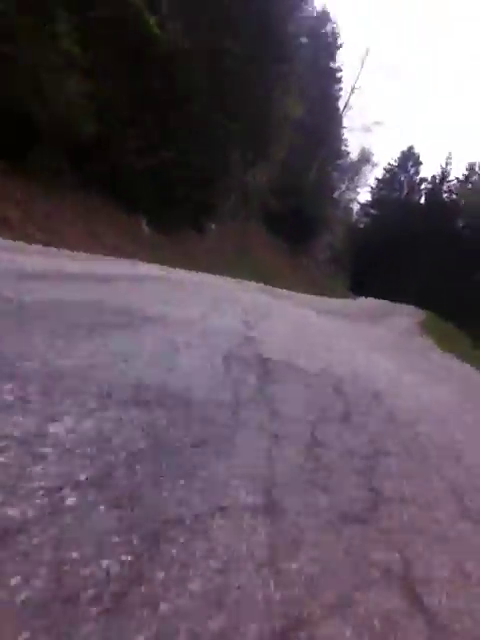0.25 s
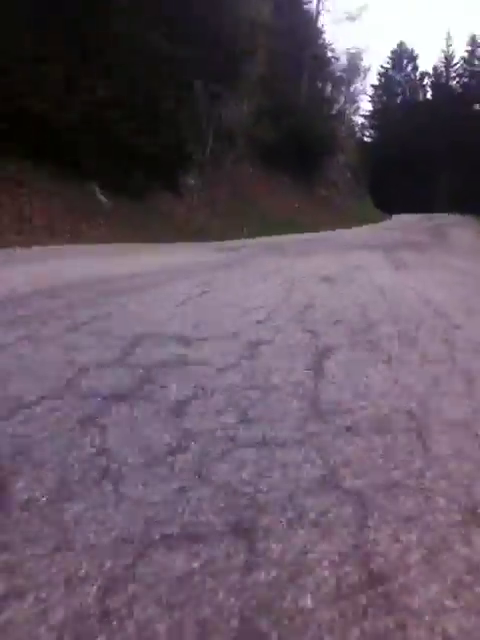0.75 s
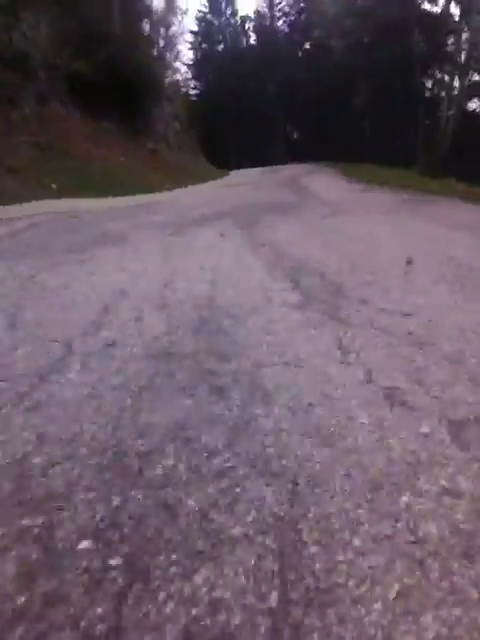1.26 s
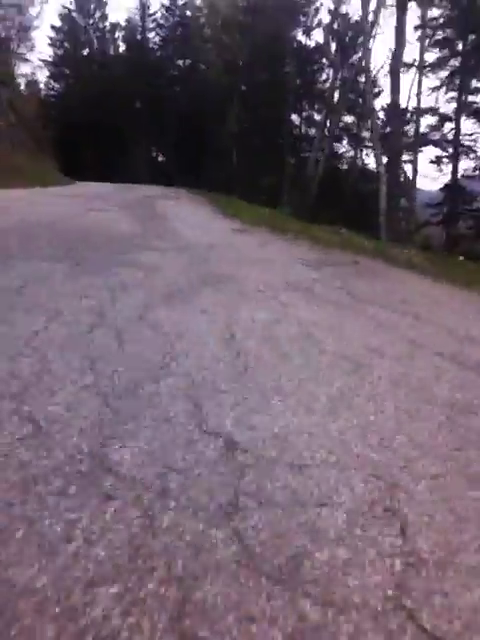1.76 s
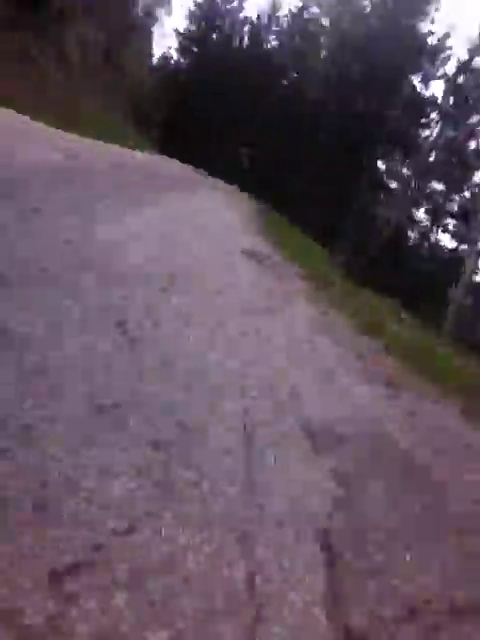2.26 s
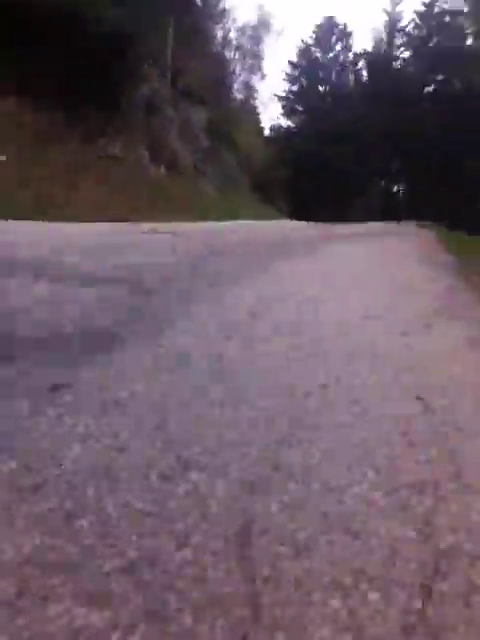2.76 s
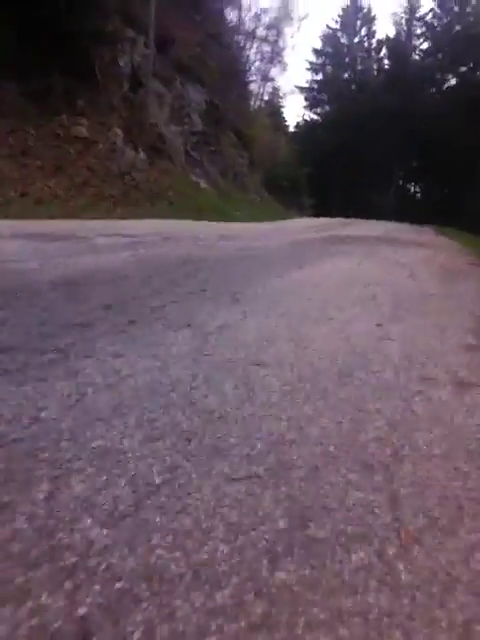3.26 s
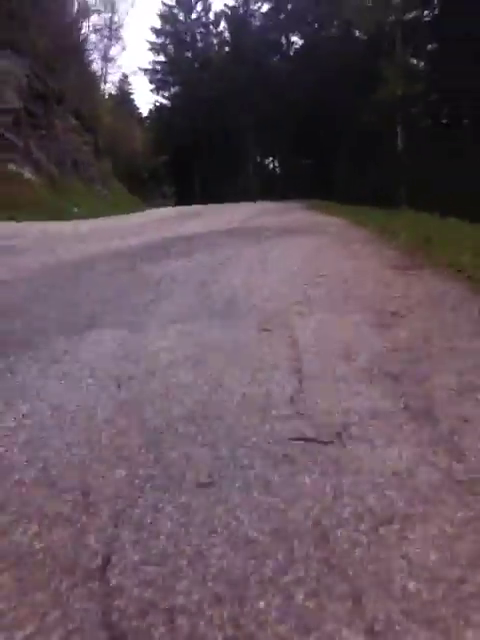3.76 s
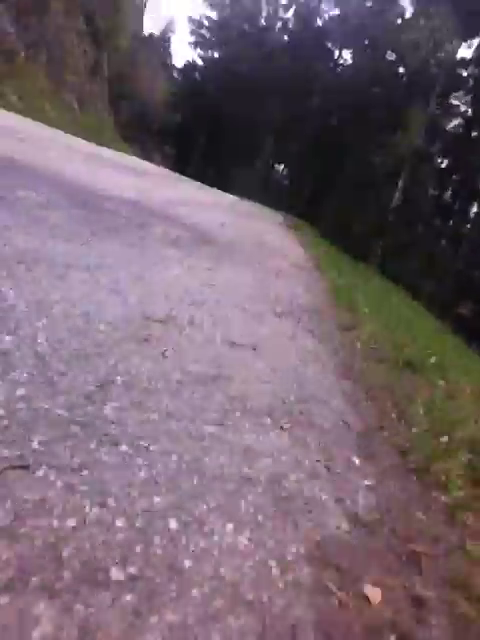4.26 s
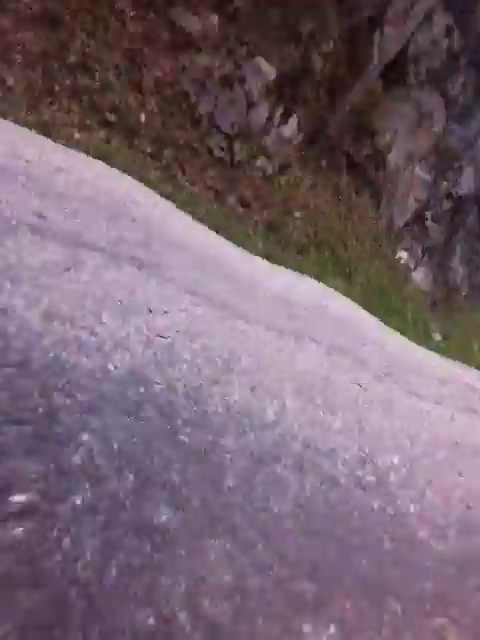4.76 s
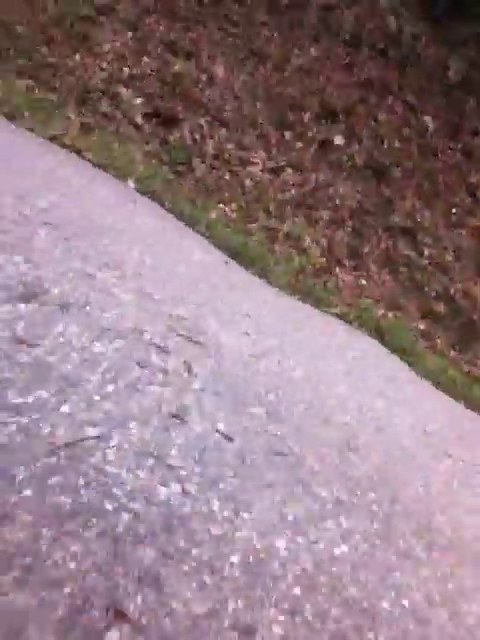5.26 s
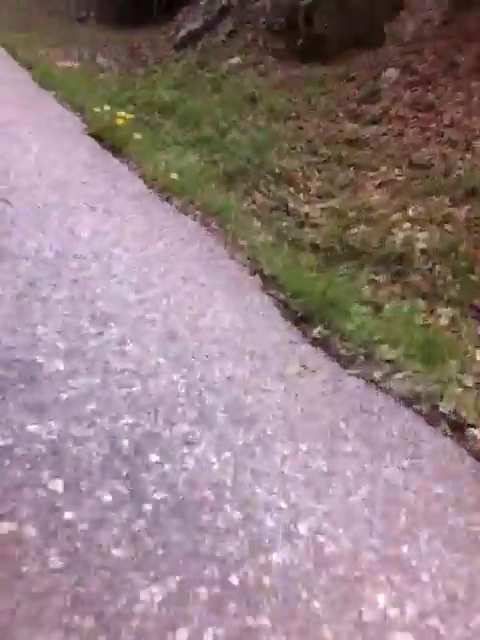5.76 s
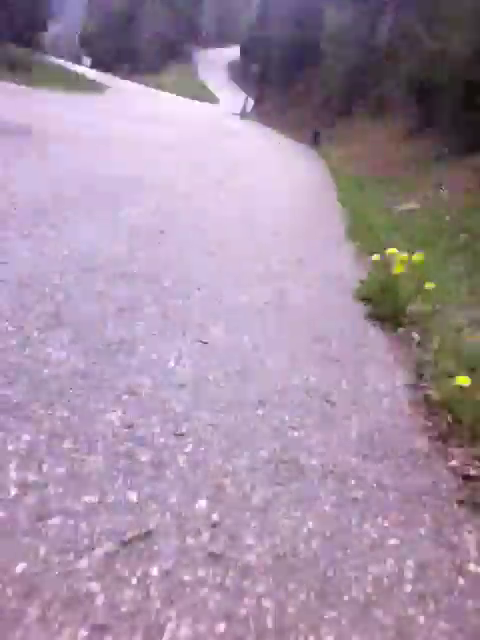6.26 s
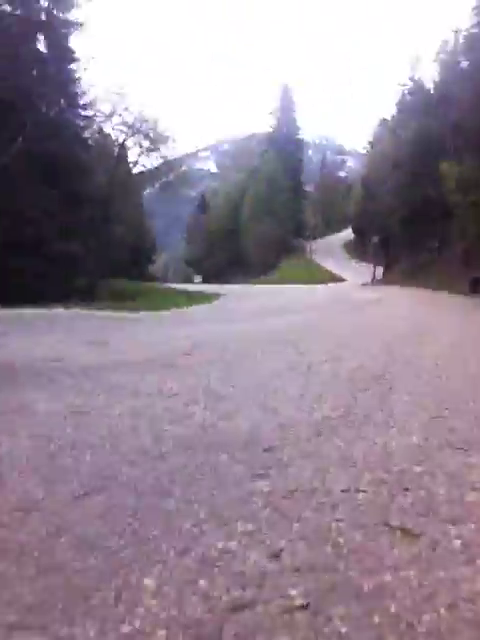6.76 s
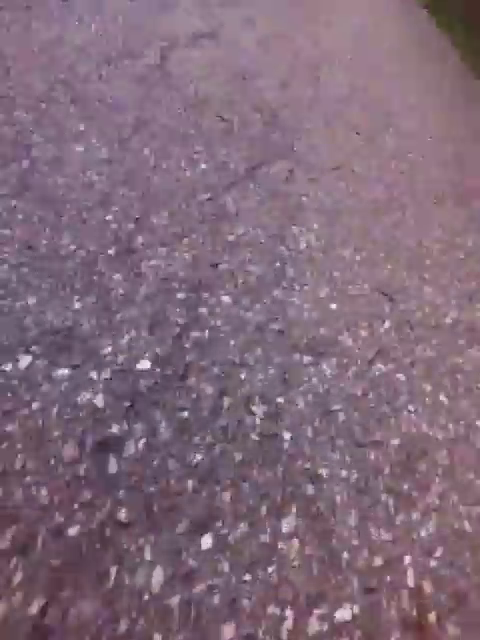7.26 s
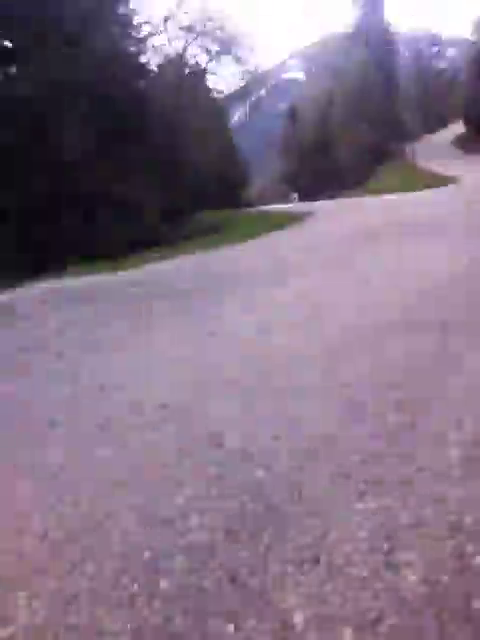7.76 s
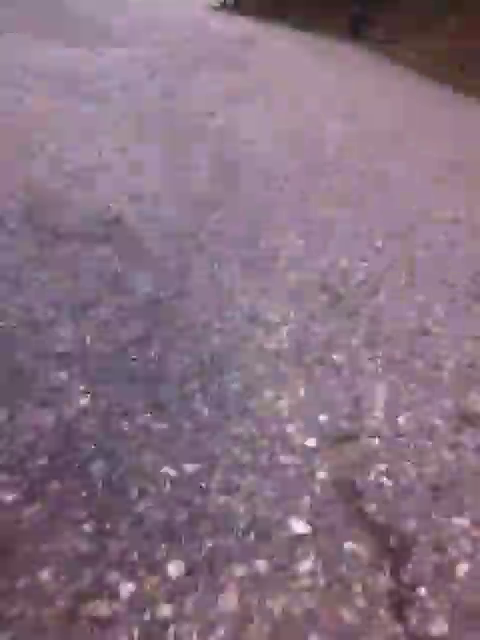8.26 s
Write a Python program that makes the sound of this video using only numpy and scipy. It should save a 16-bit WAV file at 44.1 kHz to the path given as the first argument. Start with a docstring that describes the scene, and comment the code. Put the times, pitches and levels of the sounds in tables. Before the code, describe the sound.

Skate wheels rumble loudly over coarse asphalt, with gritty crunching, plastic rattling and thumps, then the roar breaks into gaps and bursts near the end.

```python
"""On a road of coarse asphalt, skate wheels roll; a small camera on the skate hears them through its mount.
Stones kick the frame into a low rumble of two damped modes, with thumps over cracks and big stones.
Grit crunches and hisses as shaped noise and short tones; noise puffs rattle the camera case; short stretches
of grainy noise are scrapes of a wheel or several crunches run together.
The sound thins when the wheels lift now and then, and the loud swings press against a soft ceiling."""
import sys
import numpy as np
from scipy import signal
from scipy.fft import rfft, irfft, next_fast_len
from scipy.io import wavfile
from scipy.ndimage import uniform_filter1d

SR = 44100
rng = np.random.default_rng(int(sys.argv[2]) if len(sys.argv) > 2 else 0)


def materialize(psi):
    """Save the field psi as 16-bit PCM at rate SR to the path in sys.argv[1].

    A 1-D psi becomes a single channel; in a 2-D psi each row is a channel.
    """
    bounded = np.clip(np.atleast_2d(psi).T, -1, 1)
    quanta = np.round(bounded * 32767).astype(np.int16)
    wavfile.write(sys.argv[1], SR, quanta)


N = 374850  # length [samples]


def gain_of(db):
    """Turns dB into a factor for the wave."""
    return 10 ** (np.asarray(db) / 20)


def evened(x):
    """Brings x to an average (rms) strength of 1."""
    return x / np.sqrt(np.mean(x ** 2) + 1e-20)


def coloured(x, points):
    """Shapes the spectrum of x by (frequency [Hz], gain [dB]) points."""
    hz, db = np.transpose(points)
    size = next_fast_len(len(x), True)
    axis = np.fft.rfftfreq(size, 1 / SR)
    gain = gain_of(np.interp(np.log(axis + 1), np.log(hz), db))
    return irfft(rfft(x, size) * gain, size)[:len(x)]


def band(noise, hz, below_db, above_db):
    """Rows of noise around hz, falling by dB per octave squared on either side."""
    octaves = np.log2((np.fft.rfftfreq(noise.shape[1], 1 / SR) + 1) / hz)
    slope_db = np.where(octaves > 0, above_db, below_db)
    out = irfft(rfft(noise) * gain_of(-slope_db * octaves ** 2), noise.shape[1])
    return out / out.std(1, keepdims=True)


def clicks(per_s, spread_db):
    """Random train of hits, a few of them large."""
    size = gain_of(spread_db * np.minimum(rng.exponential(1, N), 4))
    return size * (rng.random(N) < per_s / SR)


def typed(table):
    """Hits at listed moments."""
    train = np.zeros(N)
    for s, db, *_ in table:
        train[min(round(s * SR), N - 1)] = gain_of(db)
    return train


def bursts(train, rise_s, fall_s):
    """Every hit opens a short puff of noise."""
    t = np.arange(2048) / SR
    shape = np.exp(-t / fall_s) - np.exp(-t / rise_s)
    return signal.oaconvolve(train, shape / shape.max())[:N] * rng.standard_normal(N)


def waver(depth_db, span_s):
    """Slow random gain: smoothed noise moves the level up and down in dB."""
    s = np.arange(0, N + 64, 32) / SR
    span = max(round(span_s / s[1]), 1)
    once = uniform_filter1d(rng.standard_normal(len(s)), span)
    slow = evened(uniform_filter1d(once, span))
    return np.interp(np.arange(N) / SR, s, gain_of(depth_db * slow))


def at_times(table, column, s):
    """Reads one column of a table at the times s, with straight lines between the rows."""
    rows = np.array(table)
    return np.interp(s, rows[:, 0], rows[:, column])


# how coarse the road is; levels are relative, each layer sets its own trim:
# (time [s], rumble level [dB], upper frame mode against the main one [dB], grit level [dB],
#  grit brightness [0-1], case rattle level [dB], pitch of lesser crunches [Hz], their level [dB])
ROAD = [(0.0,-10.5,-4,-25.5,0.53,-48,2600,-19), (.3,-11,-10.5,-27.5,0.44,-46.5,2870,-27),
        (.53,-13.5,-4.5,-28.5,0.43,-50,2650,-18), (.6,-14.5,-5.5,-33,0.44,-56,1590,-32),
        (.9,-9.5,-10.5,-29,0.26,-48,1910,-17), (1.12,-16.5,-4.5,-30,0.17,-53,1300,-34),
        (1.38,-17,-3.5,-30.5,0.38,-42.5,1190,-46), (1.7,-13.5,-5,-31.5,0.05,-50.5,1271,-21),
        (2.07,-14,-3,-29.5,0.22,-51,1420,-31), (2.15,-11,-7,-29.5,0.43,-46,1700,-14.5),
        (2.47,-12,-5.5,-23.5,0.31,-44,1780,-21), (2.78,-12.5,-5.5,-23,0.76,-46.5,1195,-17),
        (2.96,-12.5,-6,-32,0.4,-47.5,990,-23), (3.33,-10.5,-9.5,-23,0.85,-53,1339,-19),
        (3.65,-13.5,-9,-31.5,0.63,-52,1168,-30), (3.85,-10,-5.5,-25.5,0,-47.5,1515,-27),
        (4.22,-10,-9.5,-35,0.2,-46.5,993,-23), (4.5,-14,-3,-27.5,0.4,-40.5,1280,-25),
        (4.9,-11.5,-5,-27,0.46,-38,982,-28), (5.15,-12,-9,-32.5,0.54,-46.5,930,-22),
        (5.6,-11,-8,-31,0.38,-42,963,-18.5), (6.1,-15.5,-8.5,-35.5,0.43,-48.5,843,-27),
        (6.58,-18,-2.5,-33.5,0.22,-57.5,1190,-22), (6.75,-15,-13,-38,0.18,-68,1220,-27),
        (7.1,-15,-10.5,-37.5,0.4,-47,1797,-26.5), (7.55,-21.5,-4,-31.5,0.36,-47,1493,-27),
        (7.6,-23.5,0.5,-24.5,0.4,-55,1480,-27), (7.68,-19,0,-31,0.1,-43,1780,-20),
        (7.76,-13,-7,-29,0.6,-42,1505,-24), (7.8,-16,-2,-33,0.58,-48.5,902,-19.5),
        (8.05,-16,-5,-35.5,0.73,-51,844,-16), (8.5,-13.5,-5.5,-34.5,0,-45.5,902,-27)]


def curve(column):
    """One column of the road table at every sample."""
    return at_times(ROAD, column, np.arange(N) / SR)


# the wheels unload or leave the road:
# (lift time [s], landing time [s], full drop of level [dB], time to die away [s])
WHEEL_LIFTS = [(1.09, 1.142, -3.5, 0.023), (1.98, 2.033, -8, 0.018), (3.69, 4.016, -8.5, 0.034),
               (5.345, 5.439, -6, 0.029), (6.186, 6.536, -18, 0.042), (6.434, 6.526, -12, 0.026),
               (6.757, 6.775, -14, .015), (6.866, 6.99, -10, 0.064), (7.184, 7.537, -20, 0.13),
               (7.548, 7.583, -16, 0.012), (7.912, 7.937, -13, 0.022), (8.385, 8.703, -17, 0.097)]
LAND_S = 0.0063  # the level returns over this last stretch before the landing


def lift_db(s):
    """How far the wheels are off the road, as a drop in dB at the times s."""
    total = 0
    for up, down, db, fade in WHEEL_LIFTS:
        total = total + db * np.clip(np.minimum((s - up) / fade, (down - s) / LAND_S), 0, 1)
    return total


def control(column, share):
    """A dB column of the road as a gain, lowered by its share of each lift."""
    s = np.arange(0, N + 64, 32) / SR
    gain = gain_of(at_times(ROAD, column, s) + share * lift_db(s))
    return np.interp(np.arange(N) / SR, s, gain)


# short stretches of grainy noise: scrapes of a wheel, or several crunches run together:
# (start time [s], length [s], level [dB], centre [Hz])
GRAINY_STRETCHES = [(0.283, .016, -20.5, 3000), (.301, .016, -24, 2600), (1.272, 0.14, -29, 1110),
                    (6.06, 0.013, -29, 700), (6.196, 0.055, -42, 2470), (6.312, 0.025, -38, 4800),
                    (6.35, .02, -42, 1300), (6.392, 0.022, -35, 2580), (6.53, 0.0074, -27, 2000),
                    (6.876, .095, -40, 1900), (7.05, .035, -33, 800), (7.167, 0.049, -41.5, 4500),
                    (7.257, 0.039, -35, 1900), (7.396, 0.058, -37.5, 1800), (7.484, .04, -38, 3500),
                    (7.527, .01, -28, 2180), (7.535, 0.013, -25, 4200), (7.58, 0.023, -32, 2580),
                    (7.597, .06, -33, 1500), (7.68, 0.069, -33, 1100), (7.825, .01, -24, 800)]
STRETCH_EDGE_S = 0.0045  # fade in and out


def grainy_stretches():
    """Scrapes of a wheel, or crunches run together: wide, grainy noise that starts and stops quickly."""
    out = np.zeros(N)
    for s, length, db, hz in GRAINY_STRETCHES:
        t = np.arange(0, length, 1 / SR)
        roughness_db = 2.7 * evened(uniform_filter1d(rng.standard_normal(SR // 4), 60))
        grain = gain_of(roughness_db) * rng.standard_normal(SR // 4)
        wide = evened(coloured(grain, [(hz / 8, -22), (hz, 0), (hz * 8, -30)]))[:len(t)]
        edges = np.clip(np.minimum(t, length - t) / STRETCH_EDGE_S, 0, 1)
        out[round(s * SR):][:len(t)] += gain_of(db) * wide * edges
    return out


PATCH_DB, PATCH_S = 2, 0.037  # grit and rattle come in patches: depth and smoothing time
# loud knocks of the camera in its case: (time [s], relative level [dB])
CASE_KNOCKS = [(.0144,-11), (.0386,-14), (.0882,-9), (.158,-7), (.19,-15), (.2174,-5.5), (.2326,-13),
               (.3187,-17), (.4234,-9), (.4529,-8), (.4768,-9), (.4938,-17), (.7085,-13), (.7577,-11),
               (.7694,-11), (.7918,-17), (.9827,-12), (.9941,-9.5), (1.399,-10.5), (2.1732,-14),
               (2.2433,-13.5), (2.2737,-11), (2.3139,-12), (2.3246,-14), (2.5157,-20), (2.6135,-7),
               (2.6641,-16.5), (2.6813,-13), (2.7646,-14), (2.7771,-11), (2.8392,-13), (2.8527,-11),
               (2.9562,-12.5), (3.0315,-7), (3.0612,-14), (3.0879,-14), (3.7828,-11), (4.02,-19),
               (4.1116,-8), (4.2033,-13), (4.2171,-17), (4.368,-16), (4.3844,-15), (4.4054,-9),
               (4.4401,-12), (4.4643,-17), (4.5062,-13), (4.5723,-7), (4.6329,-20), (4.7429,-10),
               (4.7713,-8), (4.8509,-10), (4.886,-9), (4.903,-11), (4.9299,-8), (5.1183,-18), (5.1562,-12),
               (5.2031,-15), (5.2205,-14), (5.3729,-12), (5.4011,-15), (5.4168,-11.5), (5.5281,-10),
               (5.5401,-15), (5.5705,-14), (5.6338,-11.5), (5.6957,-13.5), (5.7583,-11.5), (5.8,-13),
               (5.8262,-32), (5.8479,-13), (5.9828,-13.5), (6.0711,-7.5), (6.0846,-15), (6.1626,-13.5),
               (6.5395,-20.5), (6.6029,-4), (6.6191,-8), (6.6717,-8.5), (6.7038,-13), (6.7304,-7.5),
               (6.7513,-11), (6.783,-8.5), (6.8451,-6.5), (7.0676,-4), (7.0798,-9.5), (7.1367,-18),
               (7.151,-31), (7.5408,-10), (7.745,-14), (7.87,-14), (7.8907,-12), (7.9229,-12), (7.99,-10.5),
               (8.0224,-15), (8.1282,-9.5), (8.1392,-10), (8.2077,-10), (8.2674,-12.5), (8.3307,-10),
               (8.3856,-15)]
# peaks and dips of the plastic case: (frequency [Hz], gain [dB])
CASE_COLOUR = [(2500, -12), (3700, -6), (4150, -7.5), (4650, 0.5), (5150, -6.5), (6750, -5), (7600, -9.5),
               (9700, -6.5), (10500, -11), (11200, -10.5), (11900, -9.5), (12500, -13.5), (13400, -9),
               (14300, -20), (15100, -16), (16000, -24)]
RATTLE_SHARE = 0.17  # of the drop in a lift


def rattle():
    """The camera taps its plastic case; each loud knock bounces once and buzzes on briefly."""
    knocks = typed(CASE_KNOCKS)
    bounced = knocks + 0.49 * np.roll(knocks, round(0.00357 * SR))
    taps = bursts(bounced, 0.00014, 0.00044)
    loud = gain_of(1.5) * (taps + 0.21 * bursts(knocks, 0.0026, 0.0028))
    small = evened(bursts(clicks(per_s=170, spread_db=1.0), 0.0001, 0.0015))
    buzz = gain_of(6.5) * small + gain_of(1.0) * rng.standard_normal(N)
    airy_points = [(3000, 26), (6000, 11.0), (10000, -24.0), (16000, -33)]
    airy = evened(coloured(rng.standard_normal(N), airy_points))
    level = control(column=5, share=RATTLE_SHARE) * waver(PATCH_DB, PATCH_S)
    case = coloured(loud + gain_of(8.0) * buzz * level, CASE_COLOUR)
    return case + airy * (0.5 * level + gain_of(-84.0))  # a trace of the airy noise always stays


def downswing(frame):
    """+1 where the frame swings down fastest, -1 where it swings up."""
    return np.sin(np.angle(signal.hilbert(frame, next_fast_len(N))[:N]))


# spectrum of dull grit, rung by the wheels: (frequency [Hz], relative level [dB per Hz])
DULL_GRIT = [(250, -56), (500, 6), (800, 1), (950, -4), (1060, 3.5), (1200, -0.5), (1400, -2), (1650, -1),
             (1830, 2.5), (2000, 0), (2300, -3), (2700, -4.5), (3300, -5), (6000, -11.5), (14000, -33)]
# spectrum of bright grit: (frequency [Hz], relative level [dB per Hz])
BRIGHT_GRIT = [(400, 23), (1000, 22.5), (2000, 10), (4000, -2.5), (8000, -33), (12000, -47.5), (16000, -48)]
GRIT_SHARE = 0.34  # of the drop in a lift
DOWNSWING_DB = 1.5  # grit bites harder while the frame swings down


def grit_bed(down):
    """Small crunches over a hiss of finer grit, dull or bright with the road."""
    small = evened(bursts(clicks(per_s=330, spread_db=4.0), 0.0013, 0.0029))
    # smooth stretches mostly hiss
    coarse_db = np.clip(0.5 * (curve(column=7) - curve(column=3)) - 1.5, -12, 9)
    mixed = gain_of(coarse_db) * small + rng.standard_normal(N)
    bed = mixed / np.sqrt(1 + gain_of(2 * coarse_db))
    bright = np.clip(curve(column=4), 0, 1)
    dull_part = (1 - bright) * evened(coloured(bed, DULL_GRIT))
    bright_part = bright * evened(coloured(bed, BRIGHT_GRIT))
    level = control(column=3, share=GRIT_SHARE) * waver(PATCH_DB, PATCH_S)
    return (dull_part + bright_part) * level * gain_of(DOWNSWING_DB * down)


# loud crunches of grit:
# (time of the middle [s], body level [dB], body pitch [Hz], basic length [ms], bright snap level [dB])
LOUD_CRUNCHES = [(0.0076, -14, 1530, 1, -24), (0.0158, -22.0, 2270, 1.96, -24),
                 (0.0256, -12.5, 2390, 1.7, -15.5), (0.0319, -16, 1130, 0.45, -14),
                 (0.0409, -15, 1650, 0.4, -26), (0.0573, -23, 1870, 0.93, -23.0),
                 (0.0615, -19, 1170, 0.45, -15), (0.0727, -13.0, 2200, 1.5, -9),
                 (0.08, -23.0, 2180, 0.66, -23), (0.0912, -16.0, 1750, 0.83, -14),
                 (0.1018, -20, 2460, 0.56, -26), (0.112, -21.0, 2470, 0.59, -23),
                 (0.1415, -22, 1300, 0.47, -10), (0.1589, -11, 2270, 0.5, -10),
                 (0.1832, -19.0, 2100, 0.66, -19), (0.1904, -28, 1770, 0.6, -15),
                 (0.2076, -23.0, 2140, 0.59, -12), (0.2179, -24, 1550, 0.4, -18),
                 (0.2278, -14.5, 825, 0.73, -28), (0.2341, -24.5, 2210, 1.13, -20),
                 (0.24, -15, 1380, 0.77, -20.5), (0.2443, -17, 1590, 0.63, -14.5),
                 (0.2651, -22, 2010, 0.46, -13), (0.2743, -15.0, 1690, 1.2, -10.5),
                 (0.2893, -8, 2150, 0.59, -16), (0.2947, -11.5, 2290, 1.8, -17),
                 (0.3062, -14, 2130, 0.94, -20), (0.3192, -23, 2290, 0.96, -12),
                 (0.334, -19.5, 2080, 1.2, -19), (0.3473, -21, 1700, 0.68, -13.5),
                 (0.3555, -28, 2550, 0.54, -9.5), (0.3686, -23, 1890, 1.2, -19),
                 (0.4017, -16.5, 2030, 1.07, -16.5), (0.4185, -21.5, 2430, 0.87, -13),
                 (0.4291, -14.5, 1730, 1.91, -15.5), (0.4406, -16, 1620, 0.65, -14),
                 (0.4544, -22.5, 1860, 0.46, -16.0), (0.4692, -19, 2510, 0.48, -9),
                 (0.4774, -15, 2070, 0.53, -17), (0.4903, -10.5, 1780, 0.52, -22),
                 (0.5295, -14.5, 1340, 0.77, -13), (0.54, -21, 2020, 0.57, -21),
                 (0.5495, -16, 2610, 0.6, -22), (0.5794, -19, 1200, 0.85, -30),
                 (0.6716, -11.5, 2200, 0.55, -18), (0.683, -20.5, 1640, 0.59, -33),
                 (0.7092, -19, 1340, 0.5, -19.5), (0.7218, -21, 1380, 0.65, -26.0),
                 (0.7505, -17, 1700, 0.5, -35), (0.7702, -17, 1200, 0.59, -23.0),
                 (0.7814, -9.5, 1390, 0.51, -12.5), (0.8223, -16, 1700, 0.79, -19),
                 (0.8315, -25, 900, 2.5, -23), (0.8438, -20, 2590, 0.7, -17),
                 (0.85, -17, 1730, 0.54, -18.5), (0.8886, -12, 2580, 0.44, -24),
                 (0.9001, -19.0, 1760, 0.6, -31.0), (0.9087, -22, 1580, 0.49, -37),
                 (0.9163, -20, 1120, 0.86, -33), (0.9509, -15, 1650, 0.44, -29.5),
                 (0.9578, -17.0, 2010, 0.94, -27), (0.9886, -21.0, 1910, 0.48, -18),
                 (1.0134, -23, 1390, 0.63, -39.0), (1.0245, -22.5, 2330, 0.53, -28),
                 (1.0666, -23, 1280, 0.72, -23), (1.0805, -14.0, 1970, 0.62, -36),
                 (1.3693, -19.0, 750, 1.22, -47.0), (1.6753, -27, 1780, 1.5, -37),
                 (1.8574, -30, 1120, 0.72, -39), (2.0547, -23, 1380, 0.61, -40),
                 (2.1159, -11.5, 1400, 1.4, -23), (2.1264, -16.0, 1780, 0.59, -20),
                 (2.143, -19, 1820, 1.3, -34), (2.1495, -20.5, 1860, 1.01, -33),
                 (2.1667, -20.5, 1790, 0.68, -26), (2.182, -15, 1460, 0.51, -27),
                 (2.2038, -22, 2430, 1.18, -32), (2.2134, -16, 770, 0.81, -24.5),
                 (2.2236, -13, 1810, 0.68, -27), (2.2389, -15, 2060, 1.59, -49.0),
                 (2.2497, -18, 2140, 2.19, -26), (2.2619, -16, 2220, 0.89, -19.5),
                 (2.2784, -16.5, 1720, 0.54, -29.5), (2.2978, -17.5, 1330, 1.2, -26.0),
                 (2.3072, -12.5, 2040, 0.77, -19), (2.3174, -12, 1930, 0.97, -21),
                 (2.3416, -19, 1950, 1.4, -15), (2.3599, -20.0, 1690, 0.6, -22),
                 (2.3718, -12, 1740, 0.56, -17), (2.3835, -13, 1620, 0.48, -34),
                 (2.3978, -20, 1990, 0.4, -20), (2.4155, -21, 1740, 0.4, -21),
                 (2.4321, -17, 1350, 0.51, -23), (2.4529, -15.5, 1460, 0.58, -30),
                 (2.458, -14, 960, 0.45, -49.0), (2.4679, -18, 1390, 0.62, -28),
                 (2.4748, -13, 1610, 0.65, -24.0), (2.4823, -14.5, 1490, 1.25, -26),
                 (2.4929, -16, 1090, 0.97, -21), (2.5051, -14, 1540, 0.44, -17),
                 (2.5109, -21, 880, 1.29, -36.5), (2.5707, -21, 1880, 0.62, -22.0),
                 (2.6, -17, 1770, 0.43, -16.5), (2.6091, -19, 1090, 0.57, -30.5),
                 (2.6303, -20.5, 1720, 0.7, -23.0), (2.6399, -14, 2170, 0.47, -28),
                 (2.6566, -20.5, 1520, 0.57, -32), (2.6702, -20, 2120, 1, -26),
                 (2.6752, -14, 1540, 0.46, -21), (2.6905, -19.0, 1200, 0.38, -40.5),
                 (2.7081, -13.5, 2010, 0.6, -29), (2.7337, -18, 1010, 0.83, -33.5),
                 (2.7571, -15, 1350, 1, -27), (2.7685, -13.5, 1500, 0.34, -27.5),
                 (2.835, -21, 980, 0.54, -49.0), (2.8452, -20.0, 1120, 0.79, -29),
                 (2.867, -22.0, 1180, 1.52, -28), (2.8873, -23, 1090, 0.49, -42.5),
                 (2.9285, -21, 2450, 0.52, -35), (3.0004, -21.5, 810, 0.65, -38.0),
                 (3.0265, -23, 1120, 0.71, -31.5), (3.0321, -20.5, 1390, 1.7, -26),
                 (3.041, -15.5, 1630, 0.54, -27.5), (3.0663, -16.5, 1430, 0.86, -23),
                 (3.1129, -12, 1850, 0.5, -18.5), (3.136, -17, 900, 0.61, -49.0),
                 (3.1712, -18, 1500, 0.69, -34), (3.2172, -12, 1430, 0.58, -38),
                 (3.2739, -19.5, 1670, 0.53, -36), (3.2967, -11, 1460, 0.69, -21),
                 (3.3178, -19.5, 1280, 0.49, -39), (3.323, -13.5, 1000, 0.85, -29.0),
                 (3.3363, -16, 1290, 1, -33), (3.35, -14, 1270, 0.4, -30), (3.3652, -12, 1330, 0.64, -34),
                 (3.3719, -7, 1350, 0.8, -27), (3.3847, -17, 1230, 1.27, -44),
                 (3.3929, -18, 1160, 1.2, -27.5), (3.4282, -25, 1000, 0.47, -40),
                 (3.4515, -14, 1440, 0.43, -39), (3.4629, -16.0, 1025, 0.64, -32.5),
                 (3.5178, -15, 1330, 0.46, -40), (3.5227, -20.0, 1050, 0.52, -44),
                 (3.5268, -19, 1360, 0.78, -46), (3.5389, -20, 1110, 1, -29.5),
                 (3.606, -16, 900, 0.69, -39.0), (3.6802, -24, 2370, 1.35, -37),
                 (3.7523, -24.5, 1740, 1.5, -27), (3.8743, -23.0, 2020, 0.66, -35),
                 (3.9744, -22.0, 1620, 0.46, -40), (4.0207, -36, 1825, 1.9, -25),
                 (4.0657, -19, 1060, 0.54, -49.0), (4.1117, -29.5, 1910, 0.36, -23),
                 (4.1616, -22.0, 940, 1.35, -49.0), (4.2095, -26, 1740, 0.93, -33),
                 (4.3793, -19, 1113, 0.49, -32), (4.3848, -22, 1630, 0.54, -21),
                 (4.41, -17.5, 1530, 1.3, -24.5), (4.4527, -24, 1520, 0.68, -33.5),
                 (4.4793, -17, 836, 1.24, -24), (4.4916, -19.0, 2140, 1, -21.5),
                 (4.5135, -18, 1370, 0.8, -31.0), (4.5744, -21.5, 874, 1.11, -31),
                 (4.6545, -15, 1010, 0.61, -30.5), (4.6789, -21.5, 850, 0.94, -44),
                 (4.708, -16.5, 1450, 0.44, -33.5), (4.7132, -17, 970, 0.48, -32.5),
                 (4.7628, -17, 810, 0.72, -49.0), (4.8068, -18, 1260, 0.7, -49.0),
                 (4.8669, -15, 1060, 1.7, -29.0), (4.8771, -16, 1420, 0.46, -28.5),
                 (4.8883, -11, 1650, 0.4, -21), (4.8919, -11, 970, 0.49, -45.0),
                 (4.8986, -17, 850, 0.41, -31.0), (4.9382, -24, 1330, 0.4, -20),
                 (4.9961, -21.0, 730, 1.2, -49.0), (5.0051, -25, 860, 0.77, -34),
                 (5.0915, -20, 990, 1.3, -49.0), (5.1339, -18.5, 1730, 0.48, -29),
                 (5.2269, -20, 1040, 1.4, -26), (5.247, -19.0, 910, 1.2, -27),
                 (5.2601, -11, 980, 1.5, -24.5), (5.3046, -16.5, 925, 3.0, -35),
                 (5.3236, -19, 1460, 1.51, -34), (5.3494, -10, 880, 0.8, -24),
                 (5.3732, -25, 1000, 0.9, -37), (5.3956, -16.0, 864, 1.4, -44),
                 (5.4036, -27, 1290, 0.36, -34.0), (5.4463, -21, 1060, 1.44, -38.5),
                 (5.489, -10, 1020, 0.79, -29.0), (5.5168, -15, 1190, 0.88, -35),
                 (5.5274, -22, 1500, 0.51, -31), (5.5495, -16, 1100, 0.51, -49.0),
                 (5.5631, -15.5, 860, 1.2, -30), (5.6341, -11.5, 1010, 0.84, -37),
                 (5.6902, -13, 940, 0.58, -31.5), (5.6983, -24, 1100, 0.89, -33),
                 (5.7214, -20, 696, 1.2, -49.0), (5.8512, -12, 920, 0.47, -39.5),
                 (5.8659, -17.5, 1100, 1.6, -34), (5.8715, -22, 960, 1.13, -29),
                 (5.9272, -21.0, 833, 1.9, -34.5), (5.9402, -18.5, 1260, 0.59, -38.0),
                 (5.9553, -17, 740, 0.85, -36.5), (6.0684, -19, 700, 0.61, -28),
                 (6.3223, -21.5, 1440, 0.46, -39.5), (6.3515, -24.0, 990, 0.61, -49.0),
                 (6.3558, -20.5, 930, 0.87, -40.5), (6.414, -11.5, 850, 0.69, -36.5),
                 (6.4221, -20, 872, 0.66, -35), (6.5873, -17, 1900, 0.6, -33.5),
                 (6.6044, -33, 1840, 0.35, -27), (6.6198, -12, 784, 0.88, -31),
                 (6.6735, -26.5, 2275, 0.4, -26), (6.7048, -46.5, 2220, 1.16, -26),
                 (6.8453, -42, 2070, 0.4, -34), (6.9762, -26, 1690, 0.82, -30),
                 (7.0677, -31.5, 1210, 0.4, -25), (7.1376, -18, 2050, 1.8, -19.5),
                 (7.1516, -33, 2480, 1, -22), (7.1806, -20.5, 1135, 0.69, -38.0),
                 (7.4021, -23, 1920, 2.2, -31), (7.4112, -21, 2250, 1.5, -27.5),
                 (7.5412, -15, 1570, 0.65, -13.5), (7.5935, -16, 1110, 0.49, -31),
                 (7.604, -11, 1530, 0.51, -34), (7.6081, -16.5, 1710, 0.76, -28),
                 (7.6132, -12.5, 1590, 0.98, -19), (7.641, -15, 1150, 0.79, -35),
                 (7.6488, -13.5, 1810, 0.77, -20), (7.6523, -21.5, 1870, 0.4, -19),
                 (7.6867, -36, 1060, 0.8, -23), (7.7024, -21, 1810, 2.1, -22.5),
                 (7.709, -12, 1200, 0.49, -49.0), (7.7133, -20, 1270, 0.4, -45.5),
                 (7.7257, -14, 1070, 0.52, -27), (7.7342, -12, 1040, 0.65, -36.0),
                 (7.7527, -10.5, 1040, 0.58, -33), (7.7649, -27, 1670, 1.22, -25),
                 (7.7915, -15, 735, 1.51, -40.5), (7.8055, -14, 820, 0.87, -41.0),
                 (7.8264, -19, 810, 1.2, -28), (7.87, -17, 790, 0.82, -28), (7.9375, -15, 772, 0.67, -26),
                 (7.9927, -15.5, 1120, 0.53, -35), (8.2069, -16, 710, 2.4, -35.0),
                 (8.2296, -22.5, 728, 1.2, -45), (8.2898, -22, 960, 0.92, -44),
                 (8.3823, -29, 2040, 1.2, -28), (8.4601, -22.5, 1660, 0.82, -28)]
CRUNCH_MS = 1.55  # typical basic length of the lesser crunches
LESSER_GAP_S, LESSER_SPREAD_DB, LESSER_OCTAVES = 0.011, 0.5, 0.77  # their spacing and scatter
LESSER_DB = -11.5  # against the crunch level of the road
LESSER_SNAP_DB = -4  # snap against body, for each octave the body lies below 4000 Hz


def lesser_crunches(down):
    """A loose train of weaker crunches that follows the road, each on a downswing of the frame."""
    place, size, tone = rng.random((1000, 3)).T
    s = (np.arange(len(place)) + place) * LESSER_GAP_S
    swings = signal.find_peaks(down, height=0.9)[0] / SR
    s = swings[np.minimum(np.searchsorted(swings, s), len(swings) - 1)]
    db = at_times(ROAD, 7, s) + LESSER_DB + GRIT_SHARE * lift_db(s)
    db = db - LESSER_SPREAD_DB * np.log(size + 0.2)
    hz = at_times(ROAD, 6, s) * 2 ** (LESSER_OCTAVES * (2 * tone - 1))
    snap_db = db + LESSER_SNAP_DB * np.log2(4000 / hz)
    # none on top of a loud one, and one at most per downswing
    clear = abs(s[:, None] - np.array(LOUD_CRUNCHES)[:, 0]).min(1) > 0.005
    fresh = np.diff(s, prepend=0) > 0
    return np.transpose([s, db, hz, CRUNCH_MS * (0.5 + place), snap_db])[clear & fresh]


SNAP_HZ, SNAP_OCTAVES = 3760, 0.3  # the bright snap of a crunch, and its scatter
RING_CYCLES, CRUMBLE_MS = 0.17, 0.2  # the body rings on, the snap crumbles on
ATTACK_SHARE = 0.7  # below 1, a crunch rises faster than it falls


def crunches(down):
    """Each crunch of grit has a body of noise and tone at its own pitch, and a bright snap of noise."""
    t = np.arange(-512, 512) / SR
    rows = np.concatenate([LOUD_CRUNCHES, lesser_crunches(down)])
    s, db, hz, ms, snap_db = rows.T[:, :, None]
    noise = rng.standard_normal((len(s), len(t) + 2))  # first two columns: random phase and snap pitch
    puff = band(noise[:, 2:], hz, below_db=0.5, above_db=13.0)
    snap_hz = SNAP_HZ * 2 ** (SNAP_OCTAVES * np.clip(noise[:, 1:2], -1, 1))
    snap = band(noise[:, :1:-1], snap_hz, below_db=8.5, above_db=13.5)  # the same noise, backwards
    woody = np.clip(1.4 - hz / 1200, 0.25, 0.6)  # each rings partly as one short tone, low ones more
    tone = 1.08 * np.sin(2 * np.pi * hz * t + 10 * noise[:, :1])
    body = (1 - woody) * puff + woody * tone
    lengths = np.array([ms + 1000 * RING_CYCLES / hz, ms + CRUMBLE_MS])  # of body and snap [ms]
    side = np.where(t < 0, ATTACK_SHARE, 2 - ATTACK_SHARE)
    swell = np.exp(-(1000 * t / (lengths * side)) ** 2)
    energy = (swell ** 2).sum(2, keepdims=True) + 3.6  # the added part lets short crunches peak higher
    both = np.array([body, snap]) * swell
    both = both / np.linalg.norm(both, axis=2, keepdims=True)
    both = gain_of([db, snap_db]) * np.sqrt(energy) * both
    padded = np.zeros(N + len(t))
    at = np.round(s * SR).astype(int) + np.arange(len(t))
    np.add.at(padded, at, both.sum(0))
    return padded[len(t) // 2:][:N]


# thumps over cracks and big stones: (time of the middle [s], relative level [dB], pitch [Hz])
THUMPS = [(0.142, -2, 166), (0.64, 5.5, 160), (0.712, 3.5, 181), (.835, -4, 200), (.96, -3, 190),
          (1.044, -1, 191), (1.068, 3, 189), (1.145, -4, 197), (1.368, 3.5, 187), (1.396, -3, 334),
          (1.45, 4, 175), (1.578, 0, 217), (1.858, -19, 195), (1.981, 0, 179), (2.056, 1, 177),
          (2.267, -4, 198), (2.456, -3, 181), (2.678, -4, 190), (2.827, -4, 176), (3.584, 0, 198),
          (3.757, -3, 219), (3.778, -3.5, 237), (3.877, -0.5, 210), (3.979, -1, 194), (4.068, 0.5, 210),
          (4.13, 2.5, 198), (4.516, 3, 189), (4.714, -1, 234), (5.091, -0.5, 175), (5.144, 0, 205),
          (5.253, 0.5, 208.5), (5.306, -8, 281), (5.439, -2, 271), (5.45, -13, 164), (5.522, -10.5, 178.5),
          (5.609, -4, 163), (5.874, 2.5, 266), (5.934, 1, 173), (6.012, -9, 180), (6.071, 0, 266),
          (6.159, -1.5, 179), (6.224, -14, 261), (6.335, -14.5, 350.5), (6.362, -14, 267),
          (6.423, -12.5, 380), (6.46, -26, 198), (6.554, -11, 240), (6.58, -0.5, 172), (6.599, -8, 290),
          (6.62, 1, 318), (6.673, -24, 326), (6.704, -1, 340), (6.731, -11, 350), (6.751, -18, 354),
          (6.787, -2.5, 198), (6.845, -5.5, 360), (6.865, -9, 168), (6.98, -15, 191), (7.026, 0, 223),
          (7.042, -1, 208), (7.076, -2, 339), (7.137, -2.5, 212), (7.178, -3, 180), (7.221, -11, 164),
          (7.277, -11, 187), (7.313, -24, 194.6), (7.374, -31, 208), (7.412, -27, 296), (7.44, -20.5, 200),
          (7.546, -12, 200), (7.643, -4, 288), (7.695, -7, 220), (7.727, -0.5, 231), (7.759, -1, 211),
          (7.795, 1, 221), (7.807, -16, 290), (7.827, -4, 320), (7.868, -5, 339), (7.903, -2.5, 297),
          (7.952, 4.5, 199), (8.014, -9, 194), (8.113, -7.5, 189), (8.129, -3, 340), (8.208, -3, 295),
          (8.231, -1, 207), (8.306, -1, 203), (8.352, 2, 179), (8.378, -6, 236), (8.41, -11, 198)]
THUMP_RISE, THUMP_FALL = 0.484, 1.05  # in cycles of the thump
OVERTONE = 0.19  # strength of a shorter, higher knock in each thump


def thumps():
    """Each thump is a few cycles of the frame that swell fast and die away."""
    t = np.arange(-512, 2048) / SR
    out = np.zeros(N + len(t))
    for (s, db, hz), turn in zip(THUMPS, rng.random(len(THUMPS))):
        swell = np.where(t < 0, np.exp(-(hz * t / THUMP_RISE) ** 2), np.exp(-hz * t / THUMP_FALL))
        low = swell * np.sin(2 * np.pi * (hz * t + turn))
        knock = OVERTONE * swell ** 2 * np.sin(2 * np.pi * (2.11 * hz * t + 3 * turn))
        out[round(s * SR):][:len(t)] += gain_of(db - 2.0) * (low + knock)
    # the small frame carries no deep bass
    high = signal.butter(N=3, Wn=85, btype="high", fs=SR, output="sos")
    return signal.sosfilt(high, out[512:][:N])


# spectrum of the main frame mode: (frequency [Hz], relative level [dB per Hz])
MAIN_MODE = [(20, -86), (45, -56), (60, -34.5), (100, -10.5), (133, 0.5), (160, 3), (190, 1), (235, -12),
             (300, -19), (1000, -95)]
# spectrum of the upper frame mode: (frequency [Hz], relative level [dB per Hz])
UPPER_MODE = [(60, -70), (150, -17.5), (230, -2.5), (290, -2), (350, -0.5), (400, -4), (460, -10.5),
              (560, -16.5), (1000, -30.5), (3000, -84)]
SWELL_DB, SWELL_S = 1.5, 0.037  # the main mode wavers: depth and smoothing time


def rumble():
    """Stones kick the frame, which answers in two broad, damped modes; the main one fades most in a lift."""
    kicks = clicks(per_s=900, spread_db=2.5) * rng.choice([-1., 1.], N)
    stones = clicks(per_s=250, spread_db=3.5) * rng.choice([-1., 1.], N)  # fewer, more uneven
    main_gain = waver(SWELL_DB, SWELL_S) * gain_of(0.24 * lift_db(np.arange(N) / SR))
    main = main_gain * evened(coloured(kicks, MAIN_MODE))
    lumpy = 0.7 * evened(kicks) + evened(stones)
    upper = gain_of(curve(column=2) + 0.37) * evened(coloured(lumpy, UPPER_MODE))
    return (main + upper) * gain_of(-1.0) * control(column=1, share=0.99) + thumps()


def scene():
    """Adds the layers; the swing of the frame also steers the grit."""
    frame = rumble()
    down = downswing(frame)
    grit = grit_bed(down) + crunches(down)
    return (grainy_stretches() + rattle() + grit + frame)[None]


CEILING = 0.735  # largest swing the soft ceiling lets through
EDGE_HZ = 15780  # upper band limit


def record(dry):
    """A soft ceiling rounds the largest swings; then a filter takes off the highest treble."""
    held = dry / (1 + abs(dry / CEILING) ** 4) ** (1 / 4)
    lowpass = signal.firwin(511, EDGE_HZ, window=("kaiser", 9), fs=SR)
    return signal.oaconvolve(held, lowpass[None], "same")


dry = scene()
out = record(dry)
materialize(out)
```